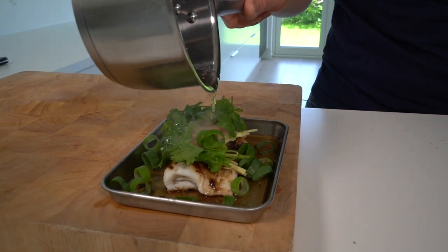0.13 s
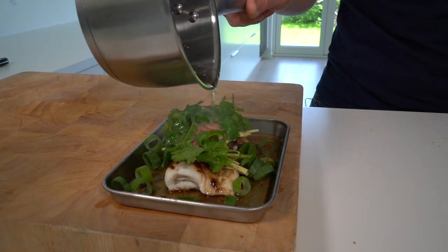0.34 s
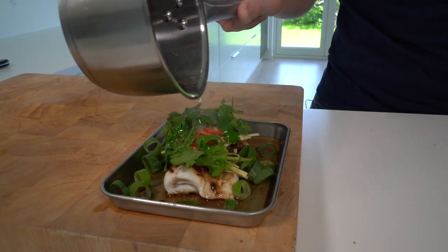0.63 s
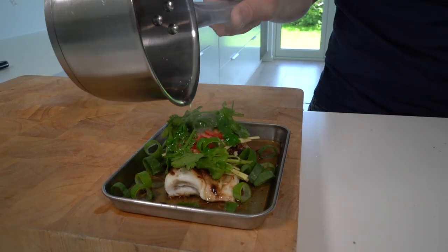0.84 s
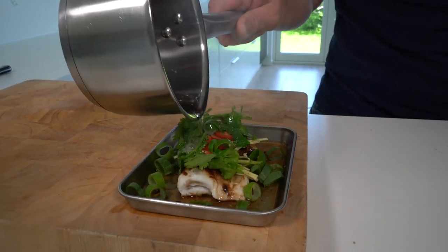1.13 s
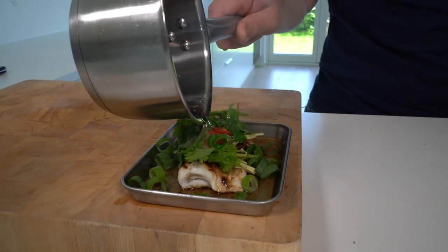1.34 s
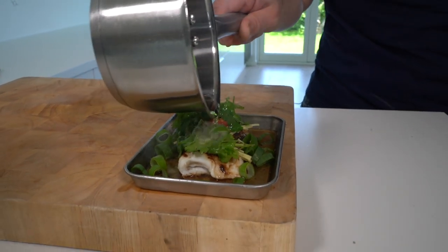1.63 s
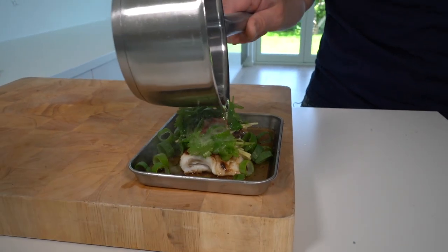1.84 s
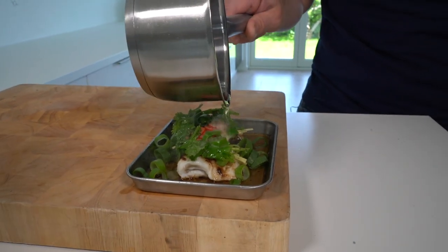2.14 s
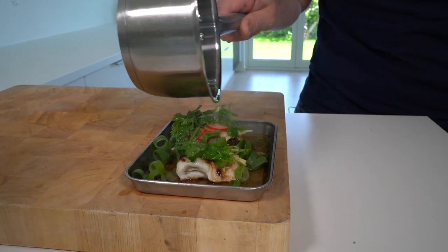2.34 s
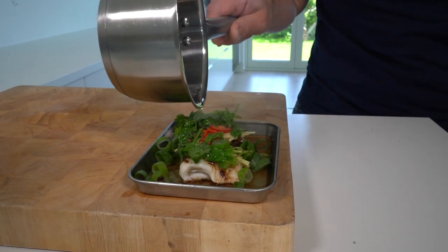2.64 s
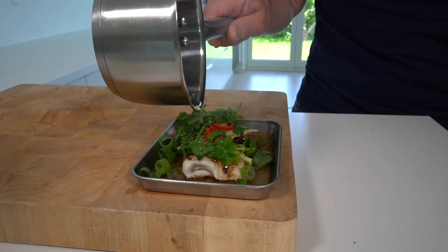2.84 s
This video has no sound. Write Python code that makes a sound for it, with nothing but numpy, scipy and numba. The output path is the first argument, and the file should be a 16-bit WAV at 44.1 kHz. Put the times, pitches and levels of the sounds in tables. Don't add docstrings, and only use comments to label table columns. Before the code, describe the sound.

Crackling sizzle of hot oil hitting fresh herbs, with a sharp early burst of loud pops

```python
import sys
import numpy as np
from scipy import signal
from scipy.fft import rfft, irfft
from scipy.io import wavfile
from scipy.ndimage import uniform_filter1d
from numba import njit

SR = 44100
rng = np.random.default_rng(int(sys.argv[2]) if len(sys.argv) > 2 else 0)


def volts_from_db(level):
    exponent = np.asarray(level, float) / 20
    return 10 ** exponent


def dump_mix(stems):
    frames = np.atleast_2d(stems).T
    limited = np.clip(frames, -1, 1)
    pcm = np.round(limited * 32767).astype(np.int16)
    wavfile.write(sys.argv[1], SR, pcm)


N = 132300

THUMP_HZ = 882


@njit
def grains(start, hz, cycles, size, count):
    out = np.zeros(count + 4000)
    for k in range(len(start)):
        first = int(start[k]) + 1
        decay = 2 * hz[k] / (cycles[k] * SR)
        s = 2j * np.pi * hz[k] / SR - decay
        turn = np.exp(s)
        z = np.e * decay * size[k] * np.exp(s * (first - start[k]))
        for j in range(min(int(9 / decay), 3900)):
            out[first + j] += z.imag * (first + j - start[k])
            z *= turn
    return out[:count]


def shaped(x, points):
    f = np.arange(2049) * SR / 4096 + 1
    hz, db = np.array(points, float).T
    log_gain = np.interp(np.log(f), np.log(hz), db) * np.log(10) / 20
    cepstrum = irfft(log_gain)
    cepstrum[1:2048] *= 2
    cepstrum[2049:] = 0
    impulse = irfft(np.exp(rfft(cepstrum)))
    return signal.fftconvolve(x, impulse)[:len(x)]


def unit(x):
    return x / np.sqrt(np.mean(x ** 2))


def walk(rate):
    hold = int(SR / rate)
    steps = np.repeat(rng.standard_normal(N), hold)[:N]
    return 3.0 * uniform_filter1d(uniform_filter1d(steps, hold), hold)


def background():
    # f/Hz, level/dB per Hz
    air_curve = [(20, -5.5), (40, -12), (65, -25), (150, -17.5), (300, -15), (1000, -33.5)]
    # f/Hz, level/dB
    mains = [(50, -78.5), (100, -83)]
    t = np.arange(N) / SR
    noise = rng.standard_normal(N)
    air = volts_from_db(-70.5) * unit(shaped(noise, list(air_curve) + [(16000, -31)]))
    hum = sum(volts_from_db(db) * np.sin(2 * np.pi * hz * t) for hz, db in mains)
    return air + hum


def echoes():
    echo_s, smear_s, echo_db = .0072, .0025, -9
    low_t60_s, treble_t60_s, room_db = 0.28, 0.31, -5
    t = np.arange(SR // 2) / SR
    noise = rng.standard_normal((2, len(t)))
    echo = noise[0] * (t > echo_s) * np.exp(-np.clip(t - echo_s, 0, 1) / smear_s)
    low = signal.lfilter(*signal.butter(1, 2500, fs=SR), noise[1])
    treble = noise[1] - low
    tail = low * volts_from_db(-60 * t / low_t60_s) + treble * volts_from_db(-60 * t / treble_t60_s)
    tail = tail * np.clip(t / 0.0019, 0, 1)
    return volts_from_db(echo_db) * echo / np.linalg.norm(echo) + volts_from_db(room_db) * tail / np.linalg.norm(tail)


def kitchen(x, count=6):
    hold = int(.004 * SR)
    spot = np.repeat(rng.integers(0, count, N // hold + 1), hold)[:N]
    wet = np.zeros(N)
    for j in range(count):
        gate = uniform_filter1d(1. * (spot == j), size=40)
        wet += signal.fftconvolve(x * gate, echoes())[:N]
    return x + wet


def tray(x):
    # f/Hz, width/Hz, level/dB
    modes = [(454, 5.6, -39), (684, 50, 10.5), (905, 190, 11), (1020, 66, 9), (1880, 900, 3),
             (2910, 280, -18), (5170, 500, 0.5)]
    ring = np.zeros(N)
    for hz, width, db in modes:
        ring += volts_from_db(db) * signal.lfilter(*signal.iirpeak(hz, hz / width, SR), x)
    return volts_from_db(-9.5) * ring


def floor_bounce(x):
    from_s, to_s, lag_s, floor_db = 1.5, 2.6, .00034, -7
    t = np.arange(N) / SR
    landing = 1. * (t > from_s) * (t < to_s)
    share = volts_from_db(floor_db) * uniform_filter1d(landing, size=SR // 10)
    reflection = np.roll(x, int(lag_s * SR + .5))
    return (x + share * reflection) / np.sqrt(1 + share ** 2)


def ticks():
    # t/s, peak level/dB
    droplets = [(0.2324, -47), (0.384, -36), (0.553, -36), (0.6609, -35), (0.8106, -46), (0.8397, -36),
                (0.982, -43), (1.065, -33), (1.207, -38), (1.46, -44), (1.7215, -37), (1.7424, -37),
                (1.808, -36), (1.8467, -34), (1.8856, -47), (2.3456, -32), (2.72, -36)]
    t, db = np.array(droplets, float).T
    hz = 12500 * (0.63 + 0.57 * rng.random(len(t)))
    cycles = np.full(len(t), 2.4)
    return grains((t + 0.00045) * SR, hz, cycles, volts_from_db(db + 6), N)


def thuds():
    # t/s, peak level/dB
    fat_bubbles = [(0.255, -29), (0.358, -37), (0.382, -55), (0.39, -24), (1.398, -44), (1.548, -44),
                   (1.582, -42.5), (1.675, -45), (1.745, -37.5), (1.859, -38), (2.037, -36.5), (2.371, -34),
                   (2.62, -34), (2.864, -40.5)]
    late_s, thud_db = 0.002266, 10.5
    t, db = np.array(fat_bubbles, float).T
    u = rng.random((2, len(t)))
    hz = THUMP_HZ * (0.68 + 1.07 * u[0])
    cycles = 0.56 + 0.081 * u[1]
    return grains((t + late_s) * SR, hz, cycles, volts_from_db(db + thud_db), N)


def swarm(count, slope, scatter_db, cycles, lo_hz, hi_hz):
    # t/s, level/dB, brightness/dB
    boil = [(0, -39.5, 6), (.18, -41.5, 8), (0.388, -25, 5), (.59, -37.5, 6.5), (.8, -36.5, 5),
            (.93, -44.5, 5), (1.028, -48.5, 1.5), (1.053, -32, 3), (1.16, -35.5, 5), (1.2, -41.5, -1.5),
            (1.38, -46, 5), (1.5, -40, 8.5), (1.8, -34, 3), (2.29, -36, 5.5), (2.35, -31.5, 3),
            (2.51, -28, 2.5), (2.6, -34, 5), (3, -45.5, 4.5)]
    mid_db = -42
    t, boil_db, bright_db = np.array(boil, float).T
    u = rng.random((4, count))
    start = u[0] * (N - 1)
    hz = lo_hz * (hi_hz / lo_hz) ** u[1]
    size = volts_from_db(-scatter_db * np.log(1 - u[2] * .975))
    cycles = cycles * (.5 + u[3])
    norm = np.sqrt(np.mean(grains(start, hz, cycles, size, N) ** 2))
    s = start / SR
    level_db = mid_db + slope * (np.interp(s, t, boil_db) - mid_db)
    tilt_db = np.interp(s, t, bright_db) * np.log2(hz / 3000) / 2
    return grains(start, hz, cycles, size * volts_from_db(level_db + tilt_db), N) / norm


def fizz():
    bursts = swarm(count=30000, slope=.92, scatter_db=2.4, cycles=1.5, lo_hz=511, hi_hz=15900)
    flicker_db = 1.5 * walk(39.83)
    return volts_from_db(-12 + flicker_db) * floor_bounce(bursts)


def crackle():
    bursts = swarm(count=4500, slope=1.1, scatter_db=2.6, cycles=1.15, lo_hz=1307, hi_hz=8450)
    return volts_from_db(-10) * floor_bounce(bursts)


def pops():
    # t/s, peak level/dB, f/Hz
    loud_a = [(0.1553, -32, 5900), (0.1642, -26, 4900), (0.2135, -28, 5000), (0.2334, -25, 5800),
              (0.2462, -27, 3300), (0.2579, -19, 3300), (0.2867, -22, 3200), (0.3116, -22, 3800),
              (0.3453, -19, 4000), (0.3602, -12, 3000), (0.3829, -16, 2400), (0.3989, -10, 4900),
              (0.4219, -15, 4700), (0.4803, -21, 4400), (0.4876, -22, 5700), (0.5019, -21, 4300),
              (0.5161, -24, 5400), (0.5367, -17, 2500), (0.5539, -25, 5100), (0.5615, -26, 4000),
              (0.5843, -25, 4100), (0.6363, -27, 4300), (0.6623, -29, 7600), (0.6812, -25, 4200),
              (0.6986, -25, 3200), (0.7121, -25, 4200)]
    loud_b = [(0.7175, -26, 5100), (0.7719, -29, 4400), (0.7877, -17, 3700), (0.7953, -27, 4400),
              (0.8113, -24, 3300), (0.8402, -28, 6400), (0.8452, -23, 6200), (0.898, -34, 3200),
              (0.971, -31, 3500), (0.9805, -35, 3200), (0.984, -31, 4000), (1.0335, -27, 3500),
              (1.0533, -23, 4000), (1.0587, -27, 3000), (1.0679, -23, 3100), (1.0736, -25, 4000),
              (1.0825, -25, 3300), (1.1174, -24, 3300), (1.1277, -26, 3300), (1.1504, -27, 3900),
              (1.1533, -24, 4600), (1.2077, -24, 4600), (1.2142, -30, 4100), (1.231, -32, 4400),
              (1.2951, -29, 2600), (1.3062, -35, 3500)]
    loud_c = [(1.4004, -29, 2700), (1.4064, -32, 4300), (1.4093, -34, 1800), (1.4625, -26, 4800),
              (1.5078, -32, 6300), (1.5823, -22, 3400), (1.5911, -25, 3400), (1.6053, -22, 3100),
              (1.6131, -21, 3600), (1.6786, -18, 3800), (1.6858, -28, 4000), (1.7197, -26, 4800),
              (1.7224, -21, 6600), (1.7426, -28, 5900), (1.748, -22, 3300), (1.7774, -26, 2400),
              (1.8117, -28, 3800), (1.8203, -27, 4100), (1.826, -25, 4200), (1.8395, -27, 3600),
              (1.8474, -26, 4000), (1.8619, -21, 2100), (1.9102, -26, 3300), (1.9792, -29, 4800),
              (2.0399, -20, 3800), (2.0861, -25, 3900)]
    loud_d = [(2.1749, -24, 3600), (2.1938, -28, 4800), (2.2119, -28, 4400), (2.242, -29, 2400),
              (2.316, -29, 2900), (2.3468, -19, 3600), (2.352, -22, 5700), (2.357, -19, 6100),
              (2.373, -15, 3200), (2.3824, -21, 3700), (2.4248, -24, 4300), (2.4439, -23, 4700),
              (2.4559, -23, 4900), (2.509, -22, 4400), (2.6223, -20, 2200), (2.7204, -24, 4700),
              (2.7375, -28, 4300), (2.7462, -25, 3400), (2.7915, -31, 3000), (2.7988, -33, 3900),
              (2.851, -24, 4100), (2.8661, -26, 2000), (2.8795, -31, 2900), (2.9023, -31, 3200),
              (2.95, -36, 5300), (2.9741, -36, 3600)]
    # t/s, peak level/dB, f/Hz
    small_a = [(0.129, -35, 5400), (0.1776, -34, 2500), (0.2189, -34, 3600), (0.2646, -29, 4000),
               (0.2781, -26, 2700), (0.3637, -22, 4800), (0.4309, -22, 4900), (0.4362, -21, 2400),
               (0.4534, -26, 2500), (0.4723, -27, 3700), (0.6244, -29, 3800), (0.6293, -30, 5100),
               (0.6568, -31, 4400), (0.6888, -32, 5300), (0.702, -33, 4100), (0.7608, -33, 4000),
               (0.7804, -32, 4900), (0.806, -29, 3000), (0.8504, -34, 3500), (0.8715, -35, 5100),
               (0.8789, -35, 4500), (0.9438, -42, 4800), (1.0296, -42, 4800), (1.0365, -37, 3900),
               (1.0647, -27, 3800), (1.146, -29, 3700), (1.161, -32, 4200), (1.2744, -41, 3300),
               (1.3266, -39, 4400), (1.5267, -36, 3000), (1.5639, -34, 4900), (1.7095, -30, 3500),
               (1.8014, -29, 3900), (1.8679, -29, 4400), (1.888, -28, 4700), (1.9383, -31, 3000),
               (1.9495, -32, 3700), (1.9529, -32, 3600), (2.1428, -29, 4700), (2.188, -30, 2900)]
    small_b = [(2.2025, -31, 4700), (2.2316, -34, 2600), (2.2369, -30, 3900), (2.2666, -33, 5100),
               (2.2704, -34, 4300), (2.2746, -36, 3000), (2.2851, -35, 3400), (2.2938, -31, 2700),
               (2.2993, -34, 3300), (2.3288, -30, 5700), (2.339, -27, 4000), (2.411, -27, 3100),
               (2.4699, -24, 3500), (2.4844, -24, 4700), (2.495, -25, 4900), (2.5126, -25, 2700),
               (2.5284, -25, 5100), (2.5373, -28, 4300), (2.5494, -28, 4500), (2.5622, -30, 4000),
               (2.6349, -29, 4700), (2.6772, -32, 4200), (2.6931, -31, 2500), (2.7049, -35, 4500),
               (2.7336, -32, 5100), (2.7915, -31, 3000), (2.8598, -33, 3000), (2.9172, -37, 3200),
               (2.9319, -39, 3000), (2.9882, -39, 4300), (2.9934, -40, 3500)]
    pop_db, crack_db, thump_db, bounce_db = 4.5, -5, -17.5, -9
    every = [np.array(run, float) for run in (loud_a, loud_b, loud_c, loud_d, small_a, small_b)]
    t, db, hz = np.concatenate(every).T
    u = rng.random((8, len(t)))
    at = (t - .4 / hz) * SR
    size, one = volts_from_db(db + pop_db), np.ones(len(t))
    start = [at, at + .4 * SR / hz, at]
    pitch = [hz * .8, hz * (1.5 + .6 * u[0]), THUMP_HZ * (.7 + .6 * u[1])]
    sizes = [size, -size * volts_from_db(crack_db), size * volts_from_db(thump_db)]
    cycles = [.6 * one] * 3
    for k in (1, 2, 3):
        start.append(at + SR * .0003 * (k + u[k + 1]))
        pitch.append(hz * (.6 + 1.2 * u[k + 4]))
        sizes.append(size * volts_from_db(bounce_db - 3 * (k - 1)))
        cycles.append(.8 * one)
    burst = grains(*map(np.concatenate, (start, pitch, cycles, sizes)), N)
    return signal.lfilter(*signal.butter(2, 10500, fs=SR), burst)


def scene():
    # f/Hz, gain/dB
    colour = [(225, -24.5), (300, -11.5), (950, -11), (1350, -9), (2000, -8), (9300, -0.5), (10800, -1.5),
              (15600, 1)]
    oil = fizz() + crackle() + pops() + thuds() + ticks()
    oil = shaped(oil, colour)
    return (kitchen(oil + tray(oil)) + background())[None]


def low_pass(x):
    return signal.sosfilt(signal.butter(12, 16830, fs=SR, output="sos"), x)


def record(dry):
    top_cut = signal.ellip(12, .2, 60, 15780, fs=SR, output="sos")
    mix = signal.sosfilt(top_cut, dry)
    return low_pass(mix)


dry = scene()
out = record(dry)
dump_mix(out)
```